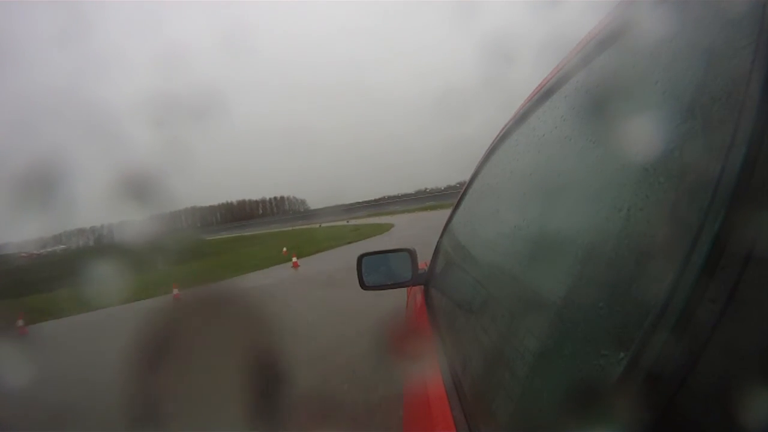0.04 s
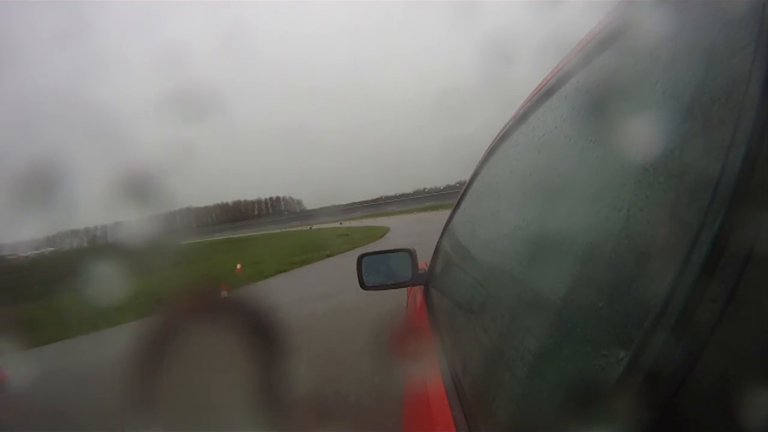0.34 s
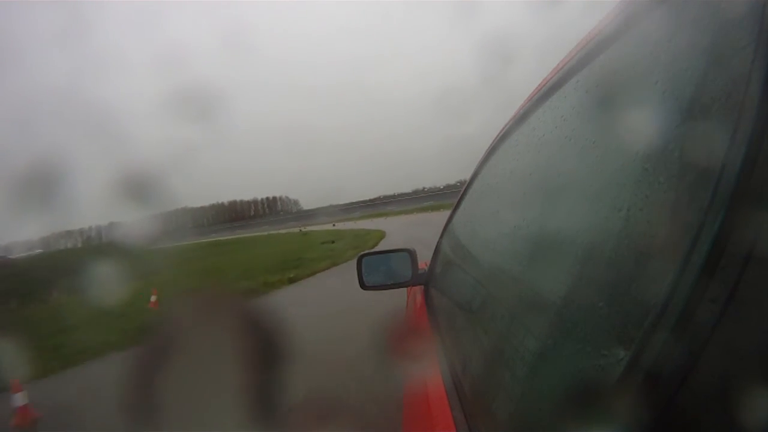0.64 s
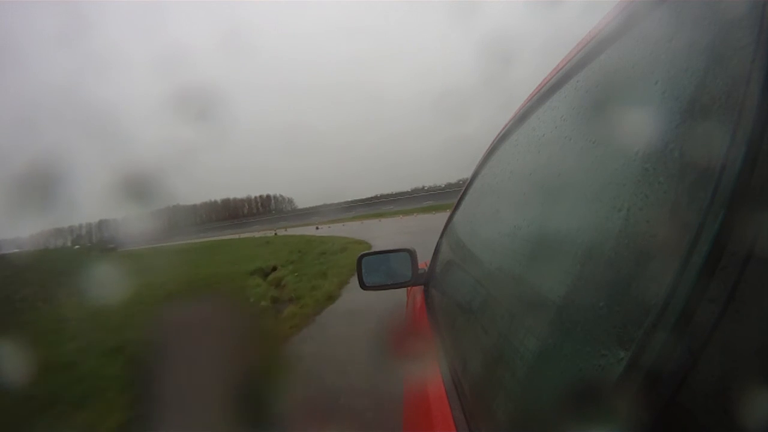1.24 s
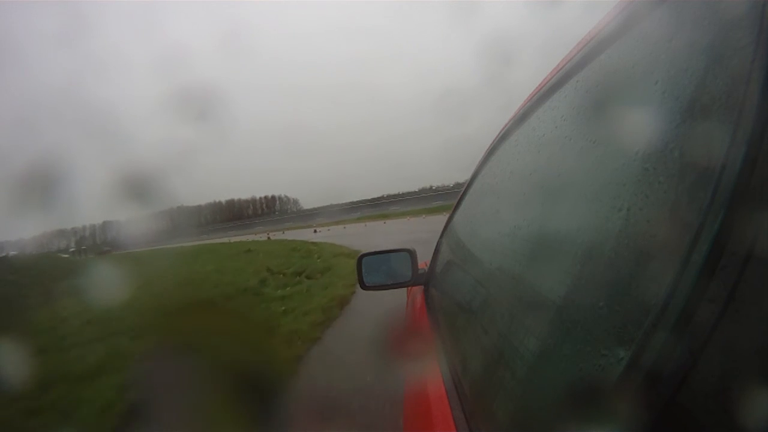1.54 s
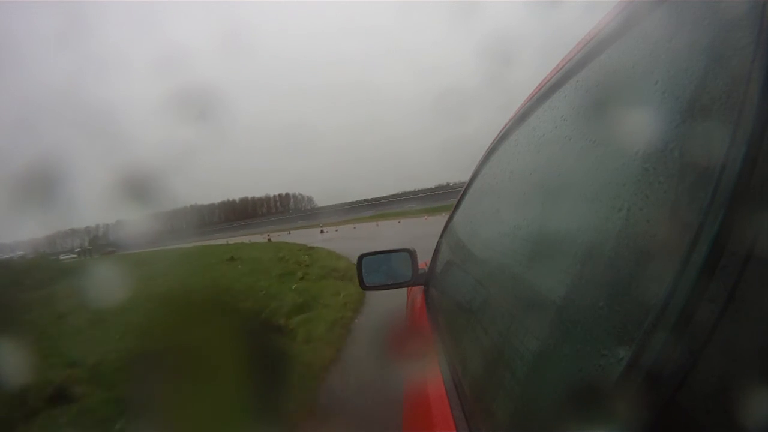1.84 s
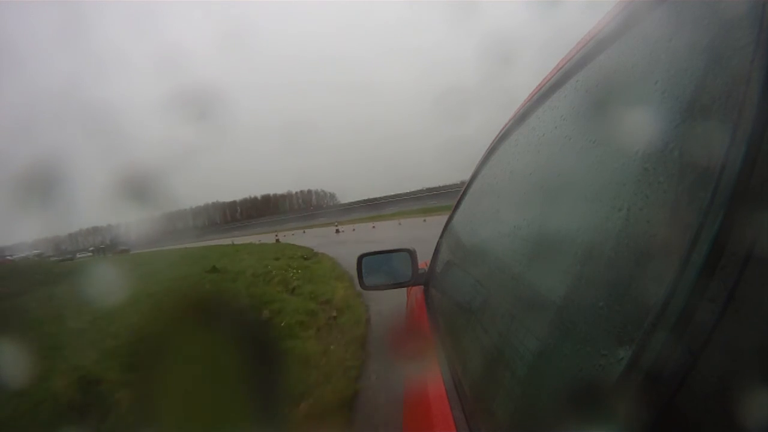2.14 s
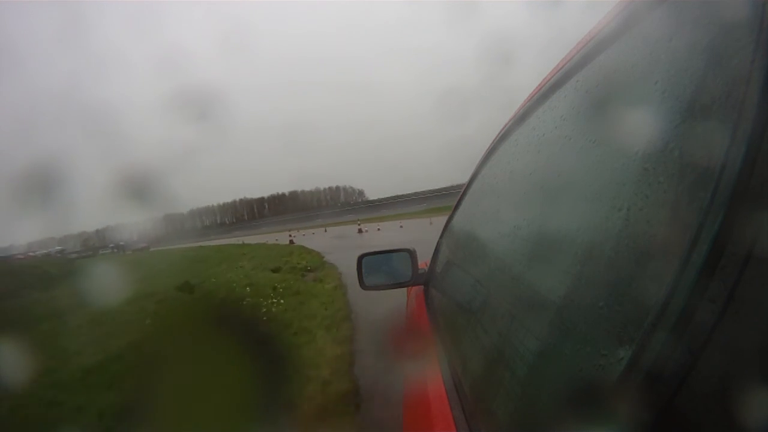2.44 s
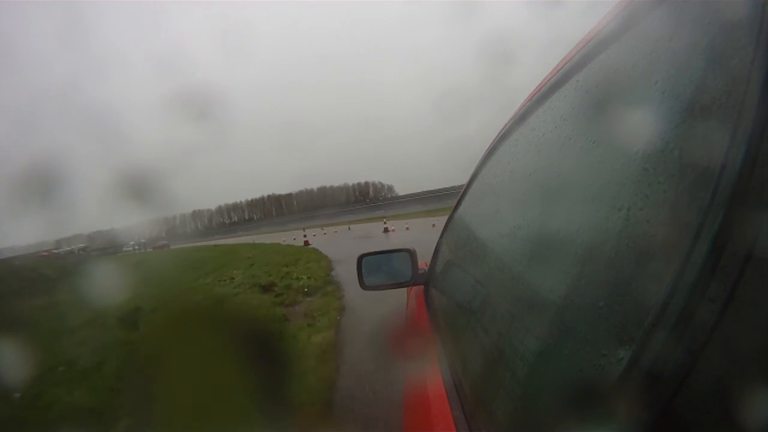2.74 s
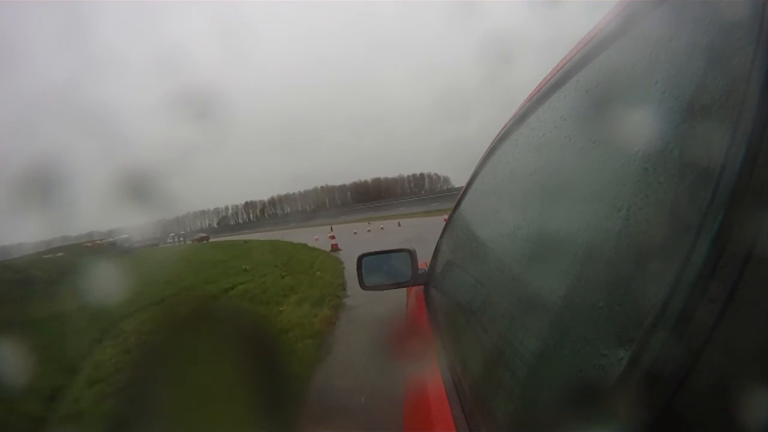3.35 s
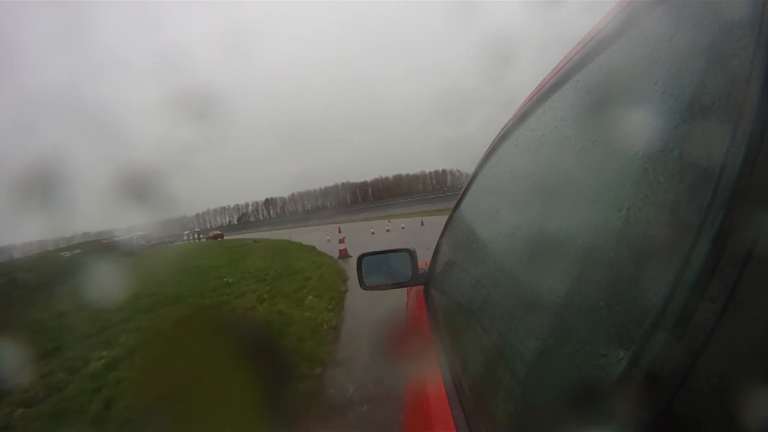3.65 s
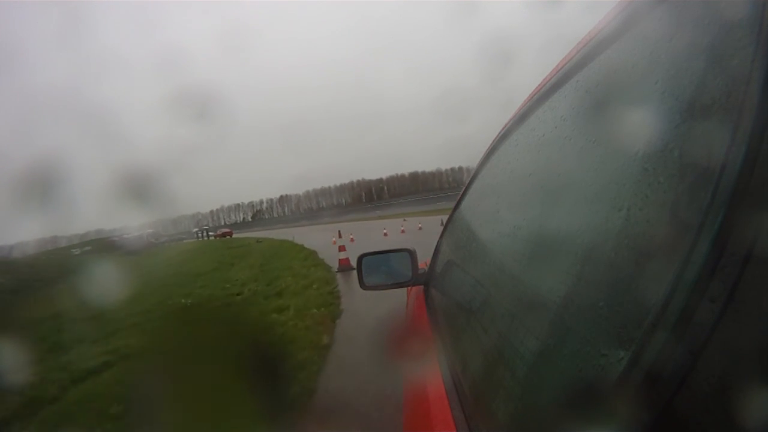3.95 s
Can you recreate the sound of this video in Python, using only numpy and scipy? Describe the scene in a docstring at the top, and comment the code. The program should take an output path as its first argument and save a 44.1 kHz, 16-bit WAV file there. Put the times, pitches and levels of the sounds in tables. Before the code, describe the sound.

A car drones at low revs over road rumble, slowing through a wet bend. Deep wind buffets the microphone on its side while tyres hiss softly, scattered drops tick close by and fine spray grows near the end.

```python
"""A car slows through a bend on a wet track, heard by the microphone of a camera in a case on its side.
The engine drones at low revs over a falling drivetrain hum and the rumble of the road.
Right at the microphone, eddies of wind make a deep, beating buffet.
Tyres hiss through the resonances of the case; spray fizzes on it and grows late in the bend,
and larger drops tick on its shell."""
import sys
import numpy as np
from scipy.fft import rfft, irfft, next_fast_len
from scipy.io import wavfile
from scipy.ndimage import map_coordinates

SR = 44100
rng = np.random.default_rng(int(sys.argv[2]) if len(sys.argv) > 2 else 0)


def transcribe(signal):
    """Save signal, clipped to [-1, 1], as a 16-bit WAV file at the path in sys.argv[1]."""
    frames = np.atleast_2d(signal).T
    limited = np.clip(frames, -1, 1)
    pcm = np.round(limited * 32767).astype(np.int16)
    wavfile.write(sys.argv[1], SR, pcm)


N = 176400

# The engine, from the car's side. Each row: time in seconds, firing rate in Hz, then the levels
# of the fundamental and its octave in dB before their trims.
FIRING = [(0, 102.4, -32, -40.5), (.25, 103.6, -29.5, -39.5), (.7, 103, -44, -46.5), (1.0, 105.9, -42, -37),
          (1.25, 109.2, -41, -35.5), (1.5, 113, -42, -34.5), (1.85, 108.8, -32.5, -40),
          (2.25, 107.5, -47, -37), (2.6, 109.6, -32, -41), (3.0, 113.1, -38.5, -42.5),
          (3.45, 114, -48, -43), (3.72, 116.5, -38, -40.5), (4, 114.2, -36, -45.5)]
# Its weak upper harmonics. Each row: multiple of the firing rate, level in dB.
ENGINE_ORDERS = [(3, -53), (4, -64)]
FUNDAMENTAL_TRIM_DB, OCTAVE_TRIM_DB = -2.5, -1

def engine():
    """Cylinders firing at low revs make a slightly uneven drone."""
    hz, fundamental_db, octave_db = curves(FIRING)
    orders = [(1, fundamental_db + FUNDAMENTAL_TRIM_DB), (2, octave_db + OCTAVE_TRIM_DB)]
    uneven_hz = hz * (1 + 0.0027 * wobble(29.6))
    return harmonics(uneven_hz, orders + ENGINE_ORDERS, waver_db=1.17, waver_rate=11)


# Hum that falls with road speed. Each row: time in seconds, pitch in Hz, then the levels of
# harmonics 1, 2 and 4 in dB before the trim.
DRIVE_HUM = [(0, 75.26, -29, -38.5, -56), (.3, 72.6, -31, -35, -48.5), (.7, 70.63, -29.5, -35, -46.5),
             (1.1, 68.44, -30.5, -47, -50), (1.5, 66, -36.5, -43, -50), (1.8, 63.33, -33, -35, -56),
             (2.05, 61, -33, -29, -37.5), (2.35, 58.32, -41, -31.5, -38.5), (2.7, 55.2, -42, -39, -54),
             (3.0, 52.2, -35, -27.5, -45), (3.4, 48.95, -38, -39, -43), (3.75, 46.5, -39, -38.5, -41.5),
             (4, 45.2, -32, -34, -44)]

def drivetrain(trim_db=-2):
    """The hum sinks as the car slows; each octave swells as it crosses a resonance of the body."""
    hz, *levels = curves(DRIVE_HUM)
    orders = [(2 ** octave, db) for octave, db in enumerate(levels)]
    uneven_hz = hz * (1 + 0.0029 * wobble(29.4))
    return amp(trim_db) * harmonics(uneven_hz, orders, waver_db=1.9, waver_rate=12)


# The road, heard through the car body. Each row: frequency in Hz, relative level in dB.
RUMBLE_COLOUR = [(12, -38), (28, -26), (48, 1), (60, -3.5), (82, -8), (101, 0.5), (122, -12.5), (152, -5.5),
                 (182, -19.5), (218, -12.5), (255, -15), (300, -26.5), (400, -30), (550, -38), (900, -41),
                 (2000, -83)]
# Its course through the bend. Each row: time in seconds, level in dB.
RUMBLE_LEVEL = [(0, -26), (.7, -25.5), (1.3, -28.5), (2.4, -27.5), (3.2, -29), (3.55, -31), (4, -30.5)]

def road():
    """Rolling wheels rumble in the resonances of the car body."""
    db, = curves(RUMBLE_LEVEL)
    return amp(db) * coloured(rng.standard_normal(N), RUMBLE_COLOUR)


# Wind right on the camera. Each row: time in seconds, level in dB before the trim.
BUFFET_LEVEL = [(0.0, -27.5), (0.13, -15), (0.15, -22.5), (0.3, -16.5), (0.52, -27.5), (0.53, -23.5),
                (0.73, -23.5), (0.77, -44), (0.82, -15), (0.93, -25.5), (1.15, -14), (1.21, -22),
                (1.25, -9), (1.31, -36), (1.34, -16.5), (1.56, -21), (1.59, -41), (1.64, -16.5),
                (1.69, -22), (2.04, -18.5), (2.1, -30), (2.15, -25.5), (2.37, -20.5), (2.42, -33),
                (2.62, -15.5), (2.68, -24.5), (2.87, -17.5), (2.94, -34), (3.0, -21), (3.13, -20),
                (3.17, -24), (3.3, -19.5), (3.4, -16), (3.48, -27.5), (3.61, -47), (3.66, -19.5),
                (3.74, -13.5), (3.85, -23), (4.0, -26)]
# The churning air under the throb. Each row: frequency in Hz, relative level in dB.
CHURN_COLOUR = [(10, -45), (26, 2), (33, -19), (46, 11.5), (56, 3.5), (80, -50), (200, -140)]

def wind(throb_hz=36.08, wander_hz=3.678, churn_db=-12, trim_db=-0.5):
    """Eddies shed past the camera make a deep throb that beats, swells and collapses."""
    db, = curves(BUFFET_LEVEL)
    throb = tone(throb_hz + wander_hz * wobble(18))
    churn = amp(churn_db) * coloured(rng.standard_normal(N), CHURN_COLOUR)
    return amp(db + trim_db + 1.26 * wobble(22.31)) * (throb + churn)


# Wet tyres, heard from inside the case. Each row: frequency in Hz, relative level in dB.
HISS_COLOUR = [(250, -10), (450, -19), (540, -8), (630, -0.5), (770, -10.5), (920, -6), (970, -6),
               (1060, 3.5), (1130, -1), (1220, 6), (1370, -3), (1460, 0.5), (1600, -5), (1850, -6.5),
               (2050, 4.5), (2320, 2.5), (2850, -6.5), (3600, -14.5), (4350, -16), (4700, -13),
               (5100, -23.5), (5600, -21.5), (6020, -34.5), (6500, -20), (7000, -33.5), (7320, -13),
               (7650, -24.5), (9000, -16), (9750, -10), (10000, -9.5), (10250, -28), (10850, -13.5),
               (11300, -36), (11650, -23), (12000, -11.5), (12600, -37), (13200, -14), (13700, -30),
               (14200, -9.5), (14750, -19), (15200, -25), (15600, -48)]
# The hiss eases as the car slows. Each row: time in seconds, level in dB before the trim.
HISS_LEVEL = [(0, -37.5), (.7, -38), (1.2, -38), (1.45, -40), (1.76, -38), (2.3, -40), (2.9, -39.5),
              (3.4, -40), (3.72, -40.5), (4, -42)]

def tyres(flutter_db=1.5, trim_db=-1):
    """Tyres on wet tarmac make a fluttering hiss."""
    db, = curves(HISS_LEVEL)
    gain = amp(db + trim_db + flutter_db * wobble(35.14))
    return gain * coloured(rng.standard_normal(N), HISS_COLOUR)


# Fine spray on the case, then the ringing it excites. Each row: time in seconds, level in dB.
FIZZ_LEVEL = [(0, -66), (1.35, -62), (1.65, -57), (2.1, -58), (2.6, -63), (2.9, -47), (3.15, -57.5),
              (3.5, -44.5), (4, -53)]
RING_LEVEL = [(0, -46), (1.1, -48.5), (1.33, -42.5), (1.48, -47.5), (1.75, -42), (2.2, -47), (2.6, -46.5),
              (3.2, -43.5), (3.45, -39.5), (3.72, -36.5), (4, -37)]
# The fizz, close up. Each row: frequency in Hz, relative level in dB.
FIZZ_COLOUR = [(800, -39), (2000, -16), (3000, 8.5), (3900, 7), (4400, 6.5), (4800, 0), (5200, -52),
               (6000, -17), (6900, -16), (7600, 2), (9200, 3.5), (10200, -28), (12000, -44), (14500, -10),
               (15600, -26)]
# Resonances of the case around the microphone. Each row: centre in Hz, width in Hz, relative level in dB.
CASE_MODES = [(617, 36, -9), (1068, 37, -7.5), (1205, 70, -3), (1399, 7.5, -4), (2119, 42, 0.5),
              (2301, 35.5, 5.5), (2626, 76, -10), (2950, 87, -8), (3395, 57, -10), (4630, 37, -12),
              (9690, 32, -5.5), (14300, 55, -11.5)]
# Bands of the ringing that the case swallows or passes. Each row: frequency in Hz, relative gain in dB.
CASE_HOLLOWS = [(5000, 1.5), (6020, -12.5), (7200, 8.5), (10800, 1), (11300, -6), (12700, 2), (13200, 3)]

def spray():
    """Thousands of droplets a second fizz on the case and set it ringing."""
    def case_response(hz):
        modes = sum(amp(db) * 1j * hz * width / (centre ** 2 - hz ** 2 + 1j * hz * width)
                    for centre, width, db in CASE_MODES)
        return modes * amp(along(CASE_HOLLOWS, hz))

    fizz_db, = curves(FIZZ_LEVEL)
    ring_db, = curves(RING_LEVEL)
    ring = unit(filtered(droplets(), case_response))
    fizz = coloured(droplets(), FIZZ_COLOUR)
    return amp(fizz_db) * fizz + amp(ring_db) * ring


def droplets(per_second=5000, scatter_db=5.5):
    """Tiny impacts of scattered size land at random."""
    lands = rng.random(N) < per_second / SR
    polarity = rng.choice([-1, 1], N)
    return lands * polarity * amp(scatter_db * rng.standard_normal(N))


# Large drops on the case, right by the microphone. Each row: start in seconds, energy in dB, treble tilt
# in dB an octave, pitch of the struck spot in Hz, level of its ping over the tick in dB.
DROPS = [(0.136, -13.5, 2, 2500, 1.5), (0.3676, -4, -2, 4800, -14), (0.7497, -15, -2, 2000, -12),
         (0.9332, -5, 1.5, 3750, -5.5), (0.9427, -16, 1, 5180, -8), (1.1788, -18, 1, 2300, -12),
         (1.2141, 1.5, 3.5, 2602, 1), (1.6143, 8, -2, 3200, -10), (1.8755, -7.5, 1, 3486, -2),
         (2.5993, -8.5, -1.5, 2760, -5), (3.0539, -10.5, 1, 5520, -10), (3.2731, -9, 1.5, 4180, -5)]
# The tick of a drop before its tilt. Each row: frequency in Hz, relative level in dB.
TICK_COLOUR = [(550, -28), (850, -12), (1250, 7), (1650, -13), (2100, 7.5), (3400, 1), (4100, -6),
               (5100, -6), (6100, -23.5), (7200, -7.5), (9300, -3.5), (10600, -13), (12000, -37),
               (14600, -2.5), (16500, -32)]
SPLASH_T60_S, SPLASH_ATTACK_S, SPLASH_GAIN = 0.013, 0.0004, 0.37
PING_T60_S, PING_ATTACK_S = 0.0055, 0.00054

def drops(size=1024):
    """Each large drop is a sharp tick, a few milliseconds of splash and a short ping of the struck spot."""
    out = np.zeros(N + size)
    t, hz = np.arange(size) / SR, np.fft.rfftfreq(size, 1 / SR)
    splash_envelope = amp(-60 * t / SPLASH_T60_S) * (1 - np.exp(-t / SPLASH_ATTACK_S))
    ping_envelope = amp(-60 * t / PING_T60_S) * (1 - np.exp(-(t / PING_ATTACK_S) ** 2))
    for start, db, tilt_db, spot_hz, ping_db in DROPS:
        force = SPLASH_GAIN * rng.standard_normal(size) * splash_envelope
        force[np.argmin(np.abs(t - SPLASH_ATTACK_S))] = 1  # the impact itself
        colour_db = along(TICK_COLOUR, hz) + tilt_db * np.log2(1 + hz / spot_hz)
        tick = np.convolve(force, causal(amp(colour_db), size))[:size]
        ping = np.sin(2 * np.pi * (spot_hz * t + rng.random())) * ping_envelope
        hit = unit(tick) + amp(ping_db) * unit(ping)
        out[round(start * SR):][:size] += amp(db) * hit / np.linalg.norm(hit)
    return out[:N]


# A close swish late in the bend. Each row: time in seconds, level in dB.
SWISH_LEVEL = [(2.5, -74), (2.75, -61), (2.92, -52), (3.1, -61), (3.3, -79)]
# Its narrow band of treble. Each row: frequency in Hz, relative level in dB.
SWISH_COLOUR = [(1500, -50), (3500, -8), (4100, 7), (4800, 17), (5200, -35)]

def swish():
    """A short sheet of spray brushes the case."""
    db, = curves(SWISH_LEVEL)
    return amp(db) * coloured(droplets(), SWISH_COLOUR)


# A faint whine behind the engine. Each row: time in seconds, level in dB.
WHINE_LEVEL = [(1.9, -77), (2.4, -54.5), (2.95, -59), (3.3, -72)]

def whine(firing_multiple=5.7):
    """A belt-driven part, locked to the engine speed, sings briefly as the revs climb."""
    hz = firing_multiple * curves(FIRING)[0]
    db, = curves(WHINE_LEVEL)
    gain = amp(db + 1.38 * wobble(10.5))
    return gain * tone(hz * (1 + 0.00675 * wobble(30.36)))


def amp(db):
    """Decibels to gain."""
    return 10 ** (np.asarray(db) / 20)


def unit(x):
    """Scale to rms 1."""
    return x / np.sqrt(np.mean(x ** 2) + 1e-20)


def along(points, hz):
    """Interpolate (Hz, value) points on a log frequency axis."""
    points_hz, values = np.transpose(points)
    return np.interp(np.log(hz + 1), np.log(points_hz + 1), values)


def curves(rows):
    """One value per sample for each column after the time."""
    seconds, *columns = np.transpose(rows)
    return [np.interp(np.arange(N) / SR, seconds, column) for column in columns]


def wobble(rate):
    """A smooth random curve, rate knots a second."""
    knots = rng.standard_normal(4096)
    return map_coordinates(knots, [np.arange(N) * rate / SR], mode="wrap")


def filtered(x, response):
    """Filter x by a complex response, given as a function of Hz."""
    size = next_fast_len(N + SR // 2)
    return irfft(rfft(x, size) * response(np.fft.rfftfreq(size, 1 / SR)), size)[:N]


def coloured(x, spectrum):
    """Shape x by (Hz, dB) points, at rms 1."""
    return unit(filtered(x, lambda hz: amp(along(spectrum, hz))))


def causal(gain, size):
    """The minimum-phase impulse response with this gain."""
    cepstrum = irfft(np.log(np.maximum(gain, 1e-6)))
    fold = 1 + np.sign(size // 2 - np.arange(size))
    fold[0] = 1
    return irfft(np.exp(rfft(cepstrum * fold)))


def tone(hz):
    """A sine of rms 1 following a pitch curve."""
    return np.sqrt(2) * np.sin(2 * np.pi * (np.cumsum(hz) / SR + rng.random()))


def harmonics(hz, orders, waver_db, waver_rate):
    """Shaft harmonics from (multiple, dB) pairs, each wavering in level on its own."""
    return sum(amp(db + waver_db * wobble(waver_rate)) * tone(round(k) * hz) for k, db in orders)


def scene():
    """Car, wind and water meet at the one microphone on the car's side."""
    return (engine() + whine() + drivetrain() + wind() + road() + tyres() + spray() + swish() + drops())[None]


BAND_LIMIT_HZ = 15900

def record(dry):
    """The camera keeps nothing above its band limit."""
    return np.array([filtered(channel, lambda hz: hz < BAND_LIMIT_HZ) for channel in dry])


dry = scene()
out = record(dry)
transcribe(out)
```